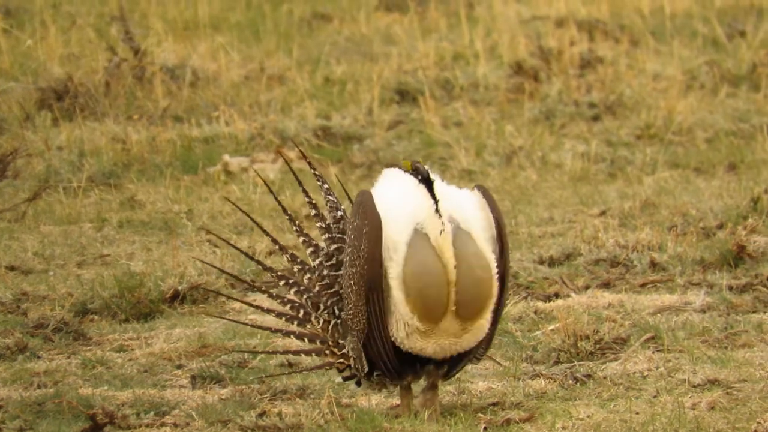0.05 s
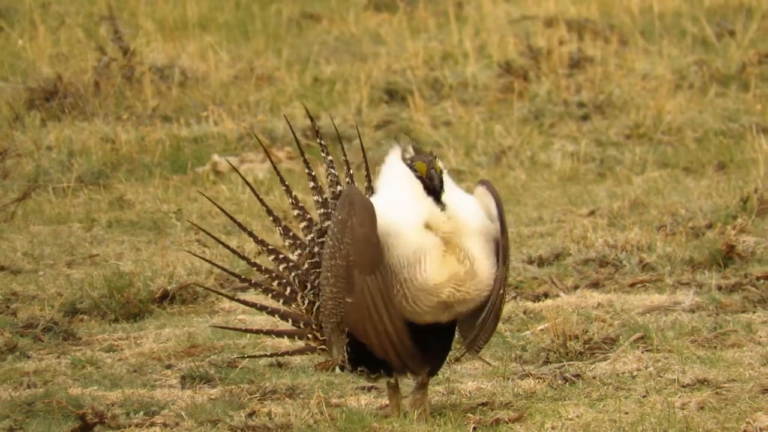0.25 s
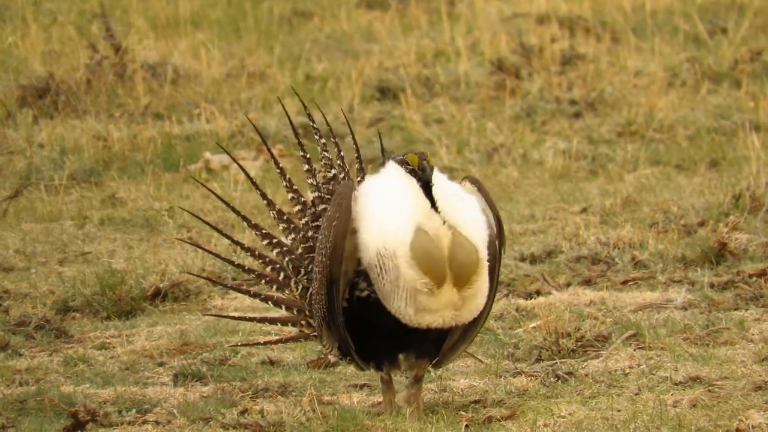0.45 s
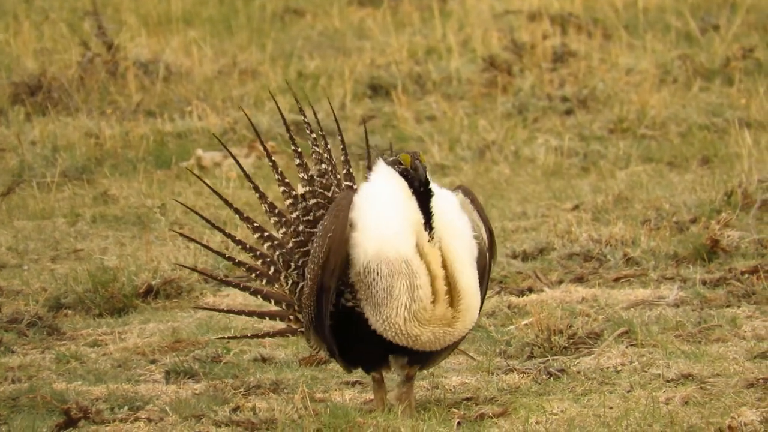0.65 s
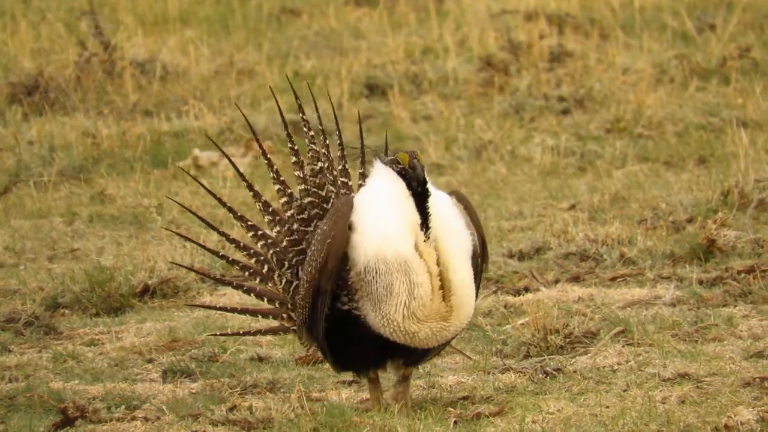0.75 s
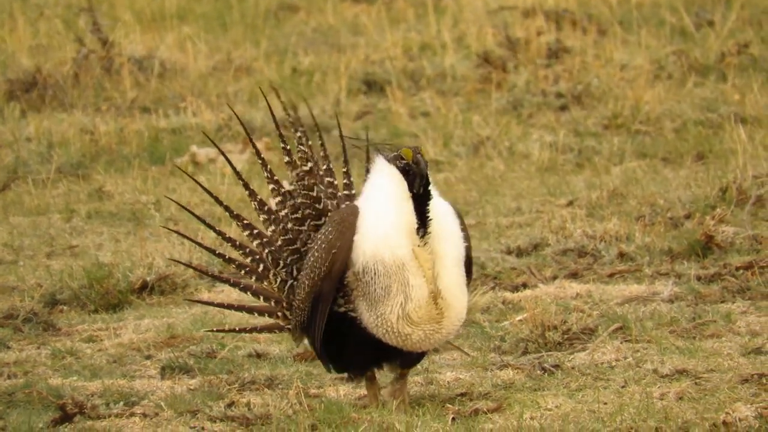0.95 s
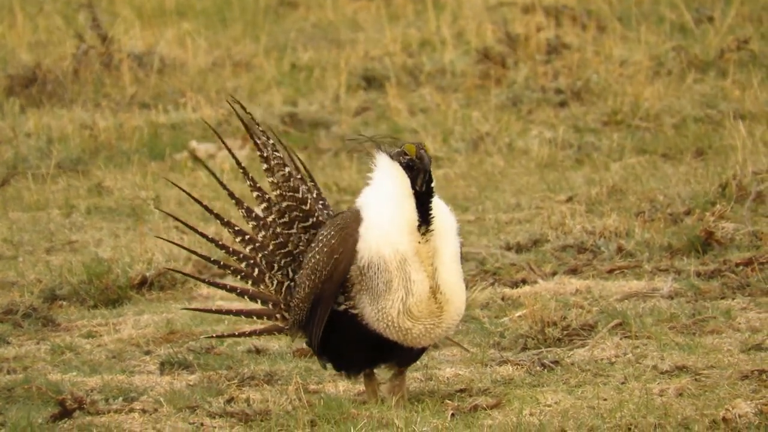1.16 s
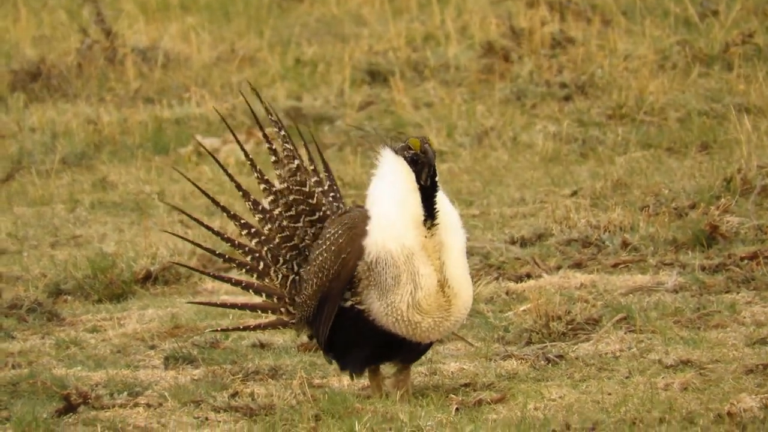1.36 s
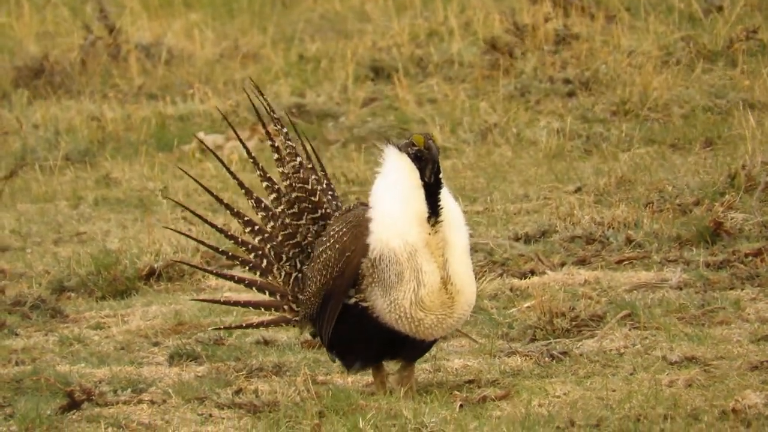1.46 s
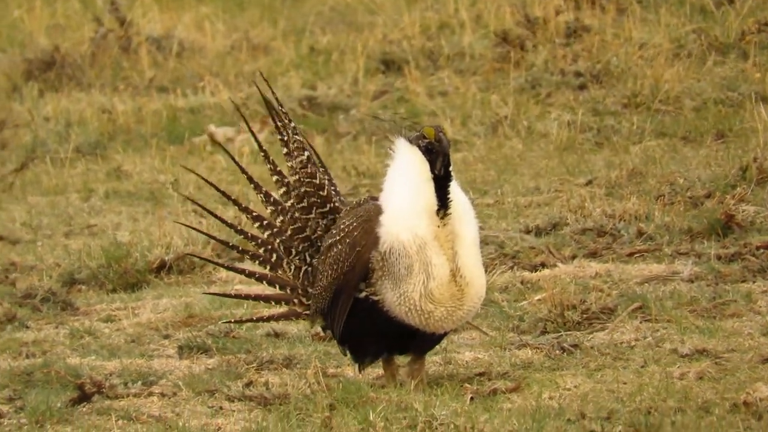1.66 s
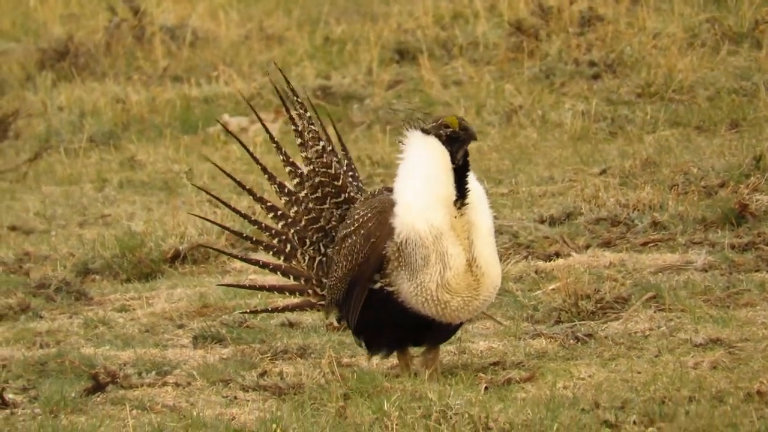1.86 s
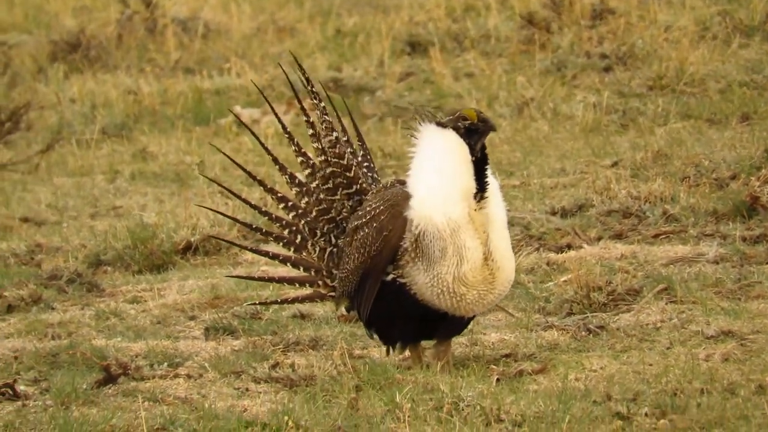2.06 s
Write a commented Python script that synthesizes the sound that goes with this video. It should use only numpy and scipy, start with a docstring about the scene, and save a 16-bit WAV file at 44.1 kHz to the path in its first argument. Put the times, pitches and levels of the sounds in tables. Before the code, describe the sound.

Uneven wind buffets the microphone on open grassland, in low thumps with flutter and rumble. Early on, a grouse gives two hollow pops with a tiny arched whistle between; a fainter pop and whistle come before.

```python
"""Gusty wind on open grassland buffets a microphone: pressure swings and random pushes make a near-mono
band of low thumps, noise bursts add flutter and rasp, and a deep rumble trails the gusts.
A grouse pops its air sacs twice (double snaps through resonances) with a short arched sine whistle between;
a farther one pops and whistles earlier. Patchy grass hiss, a faint dry tick and far narrow-band hums lie under.
The wind filter sets the level below 520 Hz in steps, block by block."""
import sys
import numpy as np
from scipy import signal
from scipy.fft import rfft, irfft, next_fast_len
from scipy.io import wavfile
from scipy.ndimage import uniform_filter1d

SR = 44100
rng = np.random.default_rng(int(sys.argv[2]) if len(sys.argv) > 2 else 0)


def log_audio(samples):
    """Write samples as a 16-bit WAV file to the path given in sys.argv[1]."""
    # one column per channel
    frames = np.atleast_2d(samples).T
    # limit to full scale, then quantise
    limited = np.clip(frames, -1, 1)
    pcm = np.round(limited * 32767).astype(np.int16)
    wavfile.write(sys.argv[1], SR, pcm)


N = 92610

# thump colour at the ports: f/Hz, gain/dB
PORT_COLOUR = [(20, -46.5), (45, -20.5), (105, -7.5), (140, 3), (300, -2.5), (460, -3), (540, -19),
               (700, -59.5), (1500, -120)]


def amp(db):
    """Amplitude ratio of a level in dB."""
    return 10 ** (np.asarray(db) / 20)


def unit(x):
    """x scaled to unit RMS."""
    return x / np.sqrt(np.mean(x ** 2) + 1e-20)


def along(points, hz):
    """Interpolate (f/Hz, value) points on a log frequency axis."""
    f, v = np.transpose(points)
    return np.interp(np.log(hz + 1), np.log(f + 1), v)


def filtered(x, response):
    """x times a response of frequency, by zero-padded FFT."""
    m = next_fast_len(N + SR // 2)
    spectrum = rfft(x, m) * response(np.fft.rfftfreq(m, 1 / SR))
    return irfft(spectrum, m)[..., :N]


def coloured(x, points):
    """x filtered by (f/Hz, gain/dB) points, zero phase."""
    return filtered(x, lambda hz: amp(along(points, hz)))


def stereo(mid, side):
    """Left and right from mid and side."""
    return np.array([mid + side, mid - side])


def drone():
    """Far steady hums: narrow Gaussian bands of noise."""
    # hums: f/Hz, half width at 1/e/Hz, RMS level/dB
    hums = [(773, 54, -75.5), (990, 68, -76), (1643, 41, -71.5), (10470, 230, -86.5)]
    out = 0
    for hz, width_hz, db in hums:
        noise = rng.standard_normal(N)
        out = out + amp(db) * unit(filtered(noise, lambda f: np.exp(-((f - hz) / width_hz) ** 2)))
    return out


def field(patchy_db=2):
    """Grass hiss, patchy in time and frequency, near mono low down and wide on top, with one faint dry tick."""
    # grass hiss and drone spectrum: f/Hz, level/dB
    hiss_colour = [(18, -47.5), (30, -13), (185, -10), (458, -19.5), (522, -7.5), (790, -6), (973, -0.5),
                   (1110, -12.5), (1630, -10), (1810, -14.5), (3660, -19), (4060, -19.5), (10900, -31.5),
                   (13700, -40), (14800, -60)]
    # left-right likeness: f/Hz, correlation
    likeness = [(100, .995), (300, 1), (630, 1), (1370, 0.83), (3000, -0.16), (6500, -0.2), (10000, -0.27),
                (14000, 0.44)]
    # tick colour: f/Hz, gain/dB
    tick_colour = [(2000, -29), (4500, 4.5), (8000, 0), (14000, -12.5)]
    field_db, tick_db, tick_s = -55, -55.5, 1.374

    z = signal.stft(rng.standard_normal((2, N)), nperseg=512)[2]
    patches = uniform_filter1d(rng.standard_normal(z.shape[1:]), size=5, axis=0)
    patches = uniform_filter1d(patches, size=6, axis=1)
    pair = signal.istft(z * amp(patchy_db * unit(patches)), nperseg=512)[1][:, :N]

    def mid_side_response(hz):
        # mid/side split that gives the wanted correlation
        angle = np.arccos(np.clip(along(likeness, hz), -1, 1)) / 2
        return amp(along(hiss_colour, hz)) * [np.cos(angle), np.sin(angle)]

    mid, side = filtered(pair, mid_side_response)
    u = np.arange(N) / SR - tick_s
    tick_noise = unit(coloured(rng.standard_normal((2, N)), tick_colour))
    tick = amp(tick_db) * np.exp(-(u / .002) ** 2) * tick_noise
    return amp(field_db) * unit(stereo(mid, side)) + tick


def pops():
    """Air sac pops: double snaps ring the sac's resonances; ground and brush scatter a noise tail."""
    # pops: t/s, peak level before scatter/dB, second snap over first/dB, upper edge/Hz
    pop_list = [(.0228, -34, -27.5, 2390), (.4407, -24, -1.5, 5500), (.6484, -38, -22.5, 5400)]
    # sac resonances, alternating in sign: f/Hz, width/Hz, gain/dB
    sac_modes = [(644, 500, -4.5), (1160, 1500, 6.5), (2000, 1200, -21.5), (2860, 1900, 8), (3900, 600, 9),
                 (5130, 700, -10)]
    snap_gap_s = 0.001005
    scatter_db, scatter_t60_s, scatter_start_s = -7.5, .04, .002

    def sac(f):
        return sum((-1) ** k * amp(db) * 1j * f * w / (c * c - f * f + 1j * f * w)
                   for k, (c, w, db) in enumerate(sac_modes))

    def delay(f, s):
        return np.exp(-2j * np.pi * f * s)

    impulse = np.eye(1, N)[0]
    direct = 0
    for s, db, second_db, edge_hz in pop_list:
        def response(f):
            double = 1 + amp(second_db) * delay(f, snap_gap_s)
            rolloff = (1 + 1j * f / edge_hz) ** 2 * (1 + (f / edge_hz) ** 8)
            return sac(f) * delay(f, s) * double / rolloff

        snap = filtered(impulse, response)
        direct = direct - amp(db) * snap / np.abs(snap).max()

    t = np.arange(2000) / SR
    tail = rng.standard_normal((2, 2000)) * amp(-60 * t / scatter_t60_s) * (t > scatter_start_s)
    # mostly shared by left and right
    tail = (tail + 2 * tail[0]) / np.linalg.norm(3 * tail[0])
    scattered = signal.fftconvolve(direct[None], tail, axes=1)[:, :N]
    return direct + amp(scatter_db) * scattered


def whistles():
    """Arched sine whistle; a farther grouse whistles the same arch earlier and softer."""
    # whistle track: t/s, f/Hz, RMS level/dB
    track = [(0.478, 1304, -65), (0.488, 1477, -58), (0.506, 2270, -62.5), (0.512, 2270, -54.5),
             (0.518, 2340, -53), (0.524, 1965, -58.5), (0.53, 1697, -53.5), (0.536, 1610, -83.5)]
    far_earlier_s, far_db = .418, -9
    t = np.arange(N) / SR
    s, hz, db = np.transpose(track)
    pitch_hz = uniform_filter1d(np.interp(t, s, hz), size=200)
    level = uniform_filter1d(amp(np.interp(t, s, db, -120, -120)), size=100)
    near = np.sqrt(2) * level * np.sin(2 * np.pi * np.cumsum(pitch_hz) / SR)
    return near + amp(far_db) * np.roll(near, -round(far_earlier_s * SR))


def rumble(gusts):
    """Deep mono noise whose level follows the gusts sluggishly and late."""
    # rumble colour: f/Hz, gain/dB
    rumble_colour = [(15, -39), (35, -12.5), (60, -3.5), (80, 14.5), (105, -10.5), (200, -46.5),
                     (500, -120)]
    under_gusts_db, window_s, lag_s = -24.5, 0.11, 0.037
    power = uniform_filter1d(gusts.mean(0) ** 2, int(window_s * SR))
    level = uniform_filter1d(np.sqrt(np.abs(power)), size=800)
    level = np.roll(level, round(lag_s * SR))
    return amp(under_gusts_db) * level * unit(coloured(rng.standard_normal(N), rumble_colour))


def flutter(envelope):
    """Brighter turbulence noise, partly each port's own; hard gusts add a rasp that swells faster."""
    # flutter colour: f/Hz, gain/dB
    flutter_colour = [(300, -44), (480, 0), (620, 4.5), (800, -3.5), (1100, -14), (2000, -49), (6000, -120)]
    # rasp colour: f/Hz, gain/dB
    rasp_colour = [(500, -41), (800, -3), (1100, 5), (1500, 0), (1900, -18.5), (2600, -25.5), (4000, -49),
                   (9000, -120)]
    side_db, rasp_db, rasp_exponent = -5, 10, 1.65
    rasp_envelope = amp(rasp_db) * envelope ** rasp_exponent
    out = 0
    for colour, size in (flutter_colour, envelope), (rasp_colour, rasp_envelope):
        mid, side = coloured(rng.standard_normal((2, N)), colour)
        out = out + size * stereo(unit(mid), amp(side_db) * unit(side))
    return out


def spread(mid, envelope):
    """The ports differ a little: independent side noise, more of it higher up."""
    # side over mid: f/Hz, ratio/dB
    side_over_mid = [(60, -41.5), (110, -53), (200, -24.5), (370, -19), (600, -18.5)]
    other = envelope * unit(coloured(rng.standard_normal(N), PORT_COLOUR))
    return stereo(mid, coloured(other, side_over_mid))


def churn():
    """Small eddies: random pushes of scattered size through the ports, with flutter."""
    # small-eddy level: t/s, RMS level/dB
    churn_level = [(0, -78), (0.169, -76), (.22, -32.5), (0.322, -36.5), (0.348, -14.5), (.38, -36),
                   (.43, -40), (.47, -36), (0.528, -56.5), (0.602, -35.5), (.65, -28), (.7, -43),
                   (0.761, -53.5), (.81, -29.5), (.86, -50), (.94, -33), (0.979, -49), (1.049, -9),
                   (1.089, -27.5), (1.2, -38.5), (1.32, -44), (1.36, -44.5), (1.45, -54.5), (1.57, -59),
                   (1.601, -27.5), (1.7, -41.5), (1.831, -32), (1.878, -39.5), (1.95, -55.5), (2.02, -77.5),
                   (2.1, -66)]
    pushes_per_s, scatter_db, flutter_db = 900, 5, -21.5
    s, db = np.transpose(churn_level)
    level = amp(np.interp(np.arange(N) / SR, s, db))
    chance, size = rng.random(N), rng.standard_normal((2, N))
    pushes = (chance < pushes_per_s / SR) * size[0] * amp(scatter_db * size[1])
    thumps = level * unit(coloured(pushes, PORT_COLOUR))
    return spread(thumps, level) + flutter(level * amp(flutter_db))


def eddies():
    """Each strong eddy: a pressure swing of a short cosine burst over a slower boom, plus a burst of flutter."""
    # strongest eddies: t/s, peak level before filter/dB, f/Hz, width at half height/ms, flutter over thump/dB
    strong_eddies = [(0.1262, -25, 216.7, 3, -29), (0.2401, -20, 287.6, 3.6, -31),
                     (0.2526, -12.5, 305, 1.3, -43), (0.2663, -16, 228.4, 1.1, -26),
                     (0.2778, -17, 205.5, 5.7, -47), (0.3027, -28.5, 284, 11, -37.5),
                     (0.3379, -16.1, 322, 3.1, -21.5), (0.3471, 1.5, 332.6, 2, -32.5),
                     (0.3584, -6, 290, 3.4, -23), (0.3812, -20, 370, 7.8, -24),
                     (0.408, -20, 223.6, 9.4, -46), (0.4553, -22.5, 266, 9.6, -44),
                     (0.4673, -15.5, 258.8, 3, -47), (0.4811, -18.5, 296, 3.2, -34.5),
                     (0.5633, -14, 243, 1, -34.5), (0.5778, -12.5, 243, 5.3, -38),
                     (0.62, -7.5, 305.3, 5.5, -41), (0.6343, -14.5, 293, 1.4, -44),
                     (0.6417, -24, 255, 1.9, -15.5), (0.649, -29, 232.3, 0.89, -30),
                     (0.6514, -11, 333, 1.6, -31), (0.6661, -20, 246, 4.5, -38),
                     (0.6796, -23.5, 250, 3.8, -41), (0.7012, -22, 238, 3.9, -51),
                     (0.7931, -23, 334, 3.2, -18.5), (0.804, -18.5, 276, 6.6, -30),
                     (0.8106, -12, 348, 2.9, -50), (0.881, -25, 284, 5.2, -36),
                     (0.9072, -22.5, 246.6, 5, -44), (0.9111, -22.5, 210.7, 8.5, -50.5),
                     (0.9271, -16, 255.6, 3.7, -30), (0.9437, -14, 328.6, 3.7, -25),
                     (1.016, -14, 211, 7.5, -41.5), (1.0228, -16.5, 212.3, 1.5, -17.5),
                     (1.0313, -18.2, 295, 1.5, -21), (1.0405, -4, 217, 0.93, -20.5),
                     (1.0527, -3.5, 252, 2.3, -16), (1.062, -16, 344, 2.7, -7),
                     (1.074, 0.5, 358, 1.7, -24.5), (1.0898, -24.5, 245, 2.1, -16),
                     (1.1033, -9.5, 282, 3.1, -29), (1.1279, -10.5, 283, 1.9, -38),
                     (1.1403, -6, 332, 1.2, -35), (1.1481, -20.5, 186, 9.7, -27.5),
                     (1.1665, -19, 346, 2.2, -33), (1.229, -22, 269, 4.6, -71),
                     (1.2367, -17.5, 382, 3.4, -38), (1.3031, -11, 273, 2.96, -31),
                     (1.5943, -16, 333, 6.4, -33), (1.6178, -17, 298, 9.2, -39.5),
                     (1.6428, -12.5, 259, 5.7, -38), (1.6465, -11, 355.3, 4.7, -42),
                     (1.655, -30, 277, 2.2, -41), (1.6749, -24, 275, 7.9, -41),
                     (1.7307, -20.8, 285, 8.4, -38), (1.748, -19, 240, 8.6, -60),
                     (1.7887, -19.5, 303, 1.6, -46), (1.8014, -33.5, 273, 3.7, -36),
                     (1.8193, -15, 270, 2.3, -22), (1.8333, -25.5, 218, 9.3, -23),
                     (1.8405, -25, 292, 3.6, -12.5)]
    # wind filter on strong eddies: f/Hz, gain/dB
    eddy_edge = [(20, -53), (50, -12.5), (105, -10.5), (135, -3.5), (470, -1.5), (560, -10.5), (800, -51.5),
                 (2000, -120)]
    boom_db, boom_hz = -16, 128
    flutter_lasts = 2.52  # times the thump's width
    reach_s = .04
    t = np.arange(N) / SR
    thumps, shape, bright = np.zeros((3, N))
    turns = rng.random((len(strong_eddies), 2))  # random phases
    for (s, db, hz, ms, flutter_db), turn in zip(strong_eddies, turns):
        near = slice(max(round((s - reach_s) * SR), 0), round((s + reach_s) * SR))
        u = t[near] - s
        bump = amp(db) * .5 ** ((2000 * u / ms) ** 2)
        boom_bump = amp(db + boom_db) * np.exp(-(boom_hz * u) ** 2)
        boom = boom_bump * np.cos(2 * np.pi * (boom_hz * u + turn[1]))
        thumps[near] += bump * np.cos(2 * np.pi * (hz * u + turn[0])) + boom
        # peak to RMS
        shape[near] += bump / np.sqrt(2)
        flutter_bump = .5 ** ((2000 * u / (flutter_lasts * ms)) ** 2)
        bright[near] += amp(db + flutter_db) * flutter_bump / np.sqrt(2)
    return spread(coloured(thumps, eddy_edge), shape) + flutter(bright)


def scene():
    """Wind gusts and their rumble over grouse, grass and hums."""
    gusts = eddies() + churn()
    return gusts + rumble(gusts) + pops() + whistles() + field() + drone()


def record(dry):
    """Wind filter: lows gain more in quieter blocks, in steps that tick in gusts; then the band limit."""
    block_s, first_block_s, wind_hz = 512 / 48000, .0083, 520
    duck = .12  # dB less gain per dB of low band
    step_hz, top_hz = 6000, 14900
    low = filtered(dry, lambda hz: hz < wind_hz)
    block = np.ceil((np.arange(N) / SR - first_block_s) / block_s).astype(int)
    block_power = np.bincount(block, low.mean(0) ** 2) / np.bincount(block)
    low_db = 10 * np.log10(block_power + 1e-9)
    # 0 dB gain in the loudest block
    ducked = low * amp(-duck * (low_db[block] - low_db.max()))
    # steps slightly rounded
    rounded = filtered(ducked, lambda hz: 1 / (1 + (hz / step_hz) ** 4))
    return filtered(dry - low + rounded, lambda hz: hz < top_hz)


dry = scene()
out = record(dry)
log_audio(out)
```